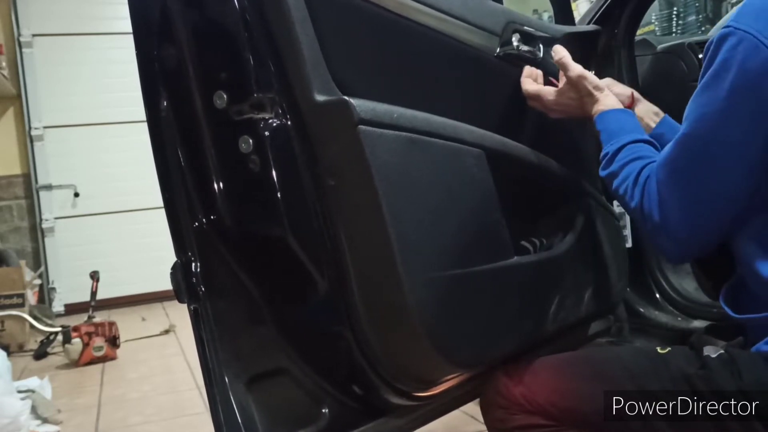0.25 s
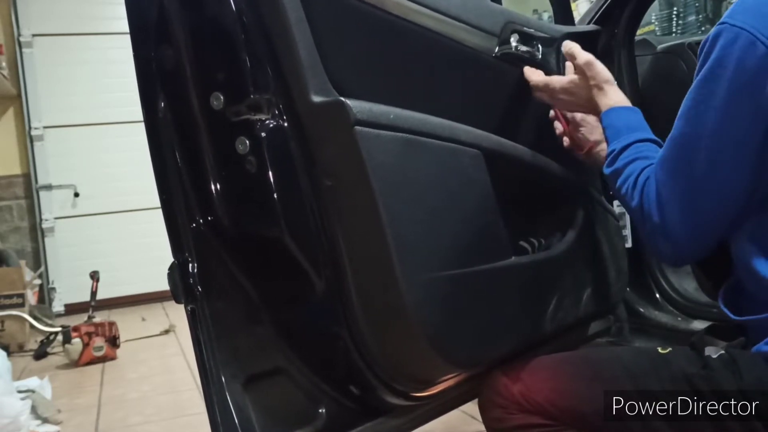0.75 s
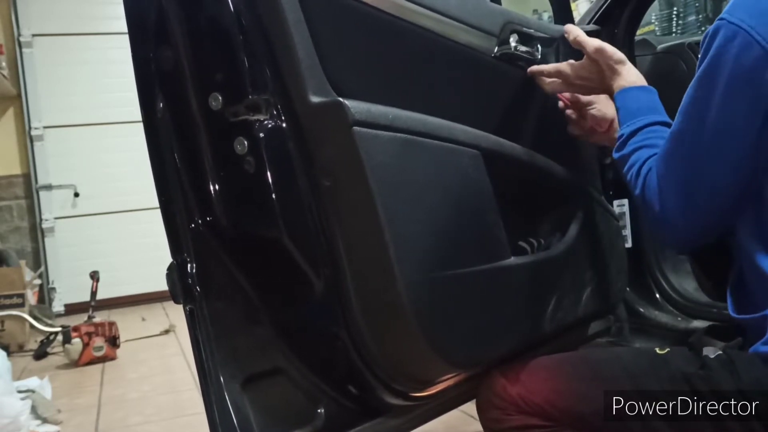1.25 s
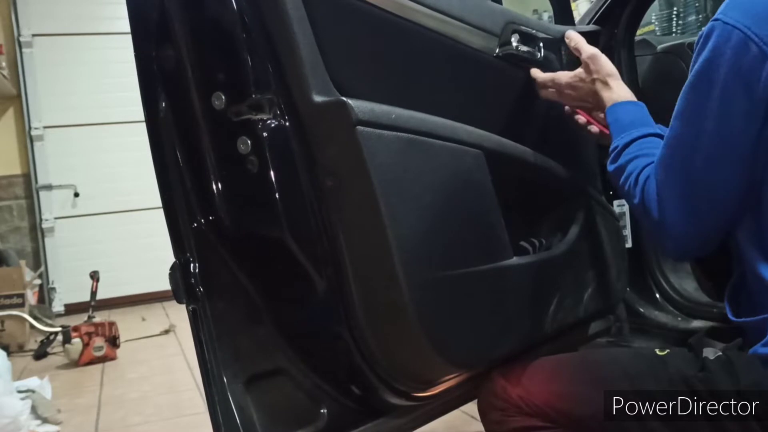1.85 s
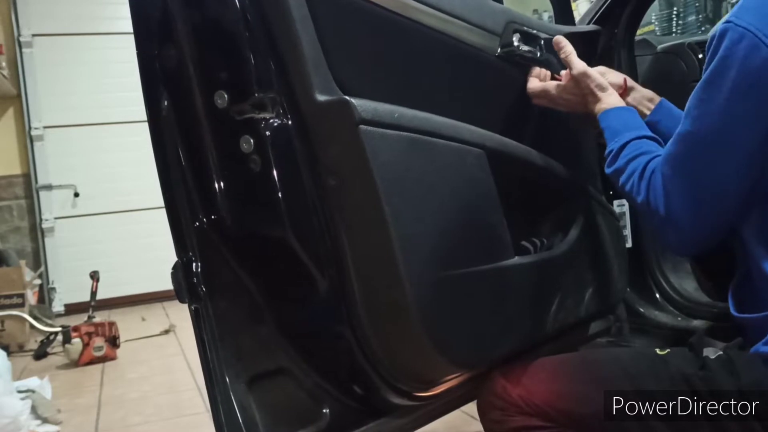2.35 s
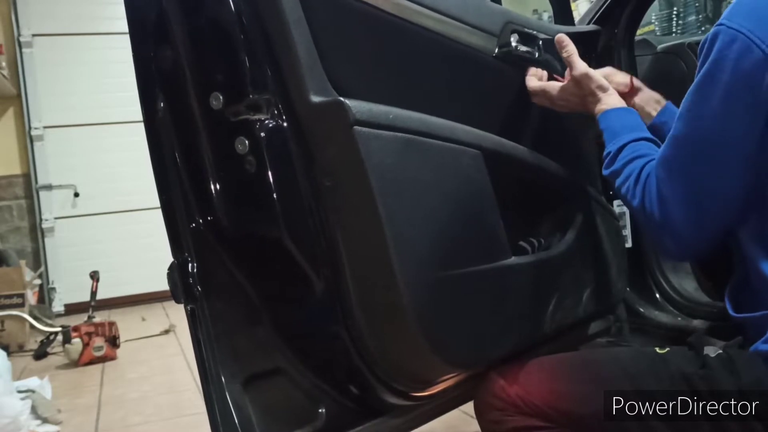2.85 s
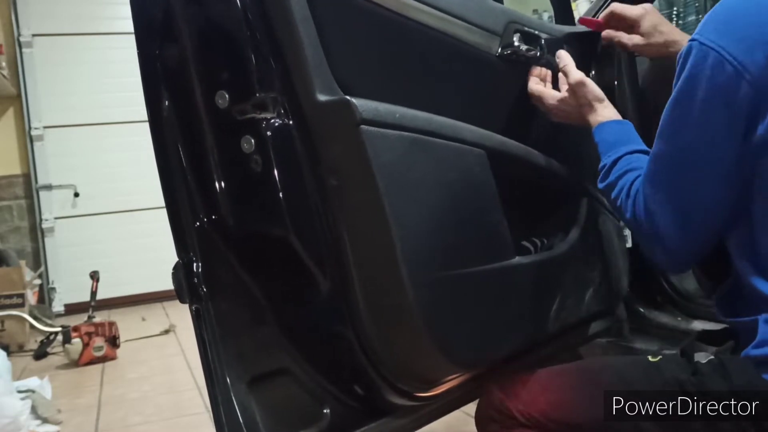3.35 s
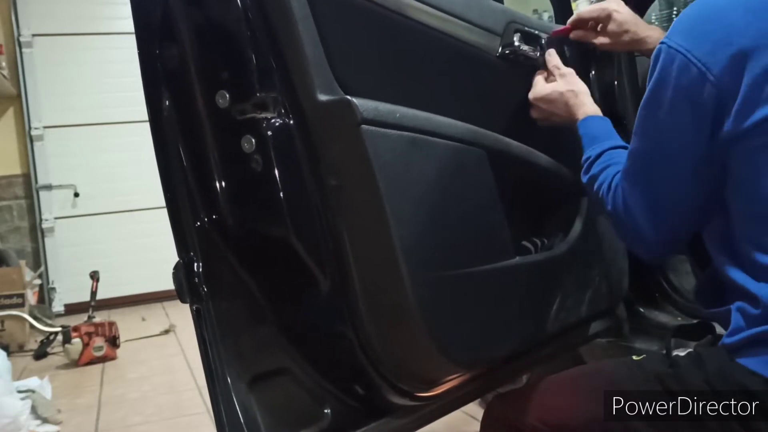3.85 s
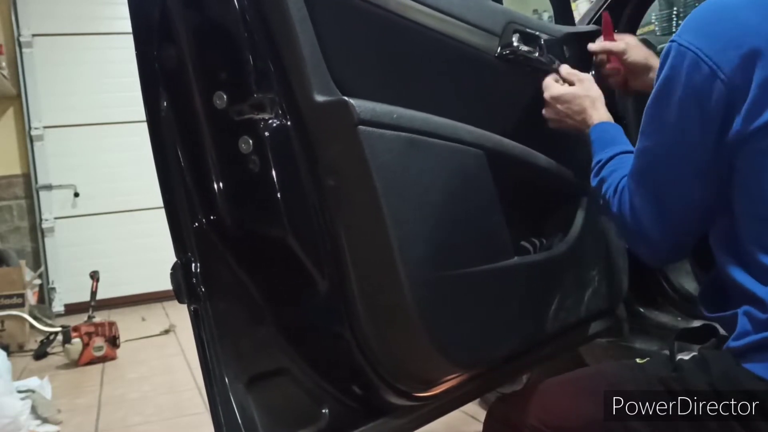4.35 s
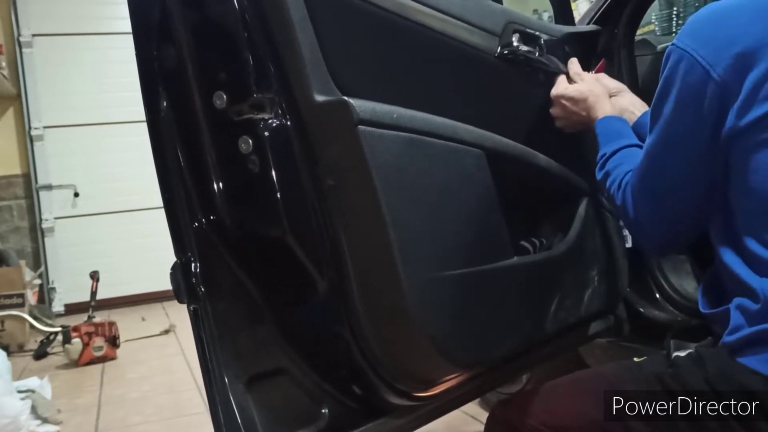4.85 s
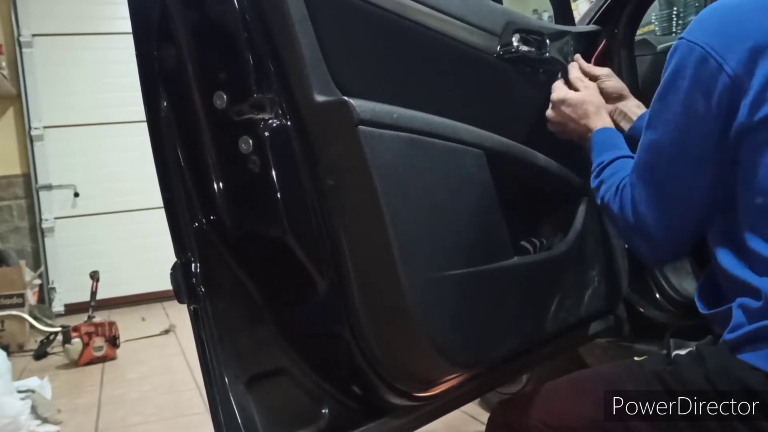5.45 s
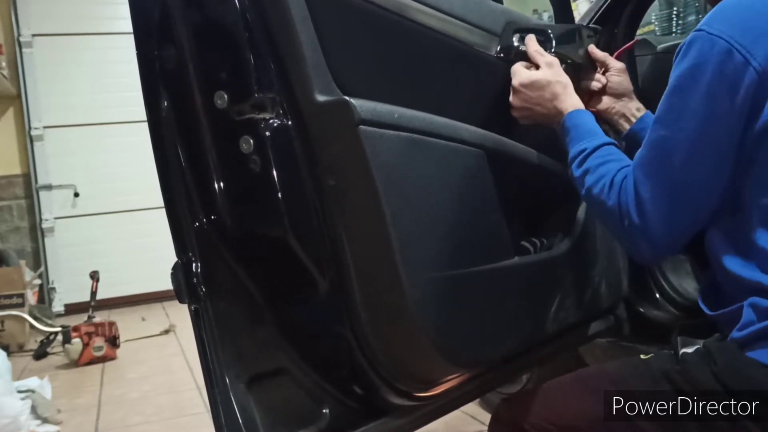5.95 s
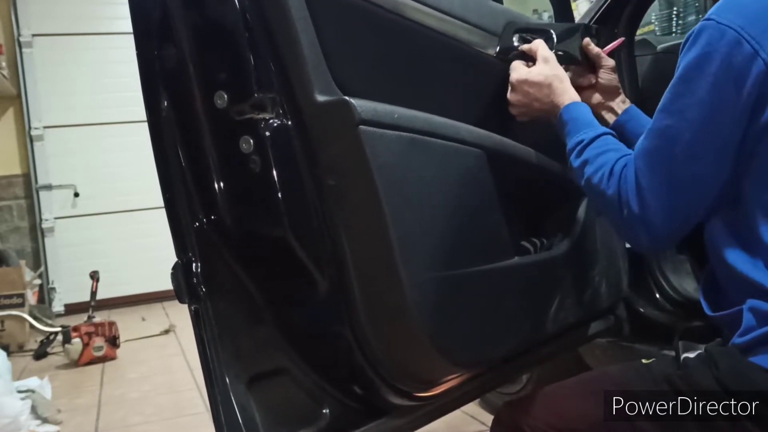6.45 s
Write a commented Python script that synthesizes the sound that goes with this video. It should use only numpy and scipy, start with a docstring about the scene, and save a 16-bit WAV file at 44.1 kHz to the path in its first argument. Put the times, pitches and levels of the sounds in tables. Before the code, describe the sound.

Plastic car door trim is pried off its clips with sharp snaps, hollow knocks, scrapes and two brief squeaks in a garage.

```python
"""A plastic trim piece is pried off an open car door in a garage. Sleeves rustle and the tool scrapes and ticks
until, at 1.6 s, a clip lets go with a sharp snap that knocks the hollow door panel. More clips follow, with
rough stick-slip squeaks at 2.8 s and 4.4 s and hollow taps of the tool's handle between. A cluster of snaps
comes near 5.2 s, then a few knocks and taps and a last scrape. The garage reverberates after every snap."""
import sys
import numpy as np
from scipy import signal
from scipy.fft import rfft, irfft, next_fast_len
from scipy.io import wavfile
from scipy.ndimage import map_coordinates

SR = 44100
rng = np.random.default_rng(int(sys.argv[2]) if len(sys.argv) > 2 else 0)


def to_wav(sig):
    """Store sig (one row per channel, or 1-D mono) as 16-bit WAV at the path in sys.argv[1].

    Samples outside -1..1 are clipped; the rate is SR.
    """
    pcm = np.clip(np.atleast_2d(sig), -1, 1) * 32767
    pcm = np.round(pcm).astype(np.int16)
    wavfile.write(sys.argv[1], SR, pcm.T)  # frames by channels


N = 295029

# modes of the trim piece: f/Hz, level/dB
TRIM_MODES = [(410, 0.5), (485, 1), (560, 1), (613, -6.5), (682, 4), (765, 6), (860, 5.5), (960, 4),
              (1050, 10.5), (1285, 9), (1510, -5), (1930, 9)]
# spectrum of a clip's crack, also of the scrape in a squeak: f/Hz, spectral level/dB
CRACK_SPECTRUM = [(900, -15.5), (2200, 3.5), (3100, 5), (4100, 7), (5500, 3), (7300, 7.5), (9000, -4),
                  (11500, -43.5)]


def amp(db):
    """Amplitude ratio of a level in decibels."""
    return 10 ** (np.asarray(db) / 20)


def unit(x):
    """Normalisation to rms 1."""
    return x / np.sqrt(np.mean(x ** 2) + 1e-20)


def along(points, hz):
    """Interpolation of (f/Hz, value) points on a logarithmic frequency axis."""
    f, v = np.transpose(points)
    return np.interp(np.log(hz + 1), np.log(f + 1), v)


def filtered(x, response):
    """Linear filtering: the spectrum of x times a frequency response."""
    n = x.shape[-1]
    m = next_fast_len(n + 2048)
    return irfft(rfft(x, m) * response(np.fft.rfftfreq(m, 1 / SR)), m)[..., :n]


def coloured(x, spectrum):
    """Spectral shaping by (f/Hz, level/dB) points, at rms 1."""
    return unit(filtered(x, lambda hz: amp(along(spectrum, hz))))


def add(track, s, sound):
    """Superposition of a sound on a track, from s seconds on."""
    part = track[..., max(round(s * SR), 0):][..., :sound.shape[-1]]
    part += sound[..., :part.shape[-1]]


def ring(hz, db, t60, t, scatter_db, detune):
    """Modal superposition: damped sinusoids that each contact excites a little differently."""
    size, shift, sign = rng.standard_normal((3, len(hz)))
    t = t[:, None]
    decay = amp(db + scatter_db * size - 60 * t / t60)
    return np.sum(np.sign(sign) * decay * np.sin(2 * np.pi * hz * (1 + detune * shift) * t), 1)


def focus(hz, pitch_hz, octaves):
    """Selective excitation: nearness, 0-1, of a frequency to the pitch a contact point favours."""
    return np.exp(-np.log2((hz + 1) / pitch_hz) ** 2 / (2 * octaves ** 2))


def blow(x, t, rise_s):
    """Finite rise of a struck sound, at rms 1 over its first 20 ms."""
    x = x * (1 - np.exp(-t / rise_s))
    return x / np.sqrt(np.mean(x[..., t < .02] ** 2))


def pulse(spectrum, t):
    """Impulse response of a spectrum, as strong as a blow."""
    x = coloured(signal.unit_impulse(len(t), SR // 1000), spectrum)
    return x / np.sqrt(np.mean(x[t < .02] ** 2))


def diffuse(pair):
    """Diffuse-field coherence: two unrelated signals become alike mainly in the bass."""
    coherence = [(60, 0.26), (130, 0.52), (250, 0.77), (640, 0.33), (1400, 0), (15000, 0.11)]  # f/Hz, left-right correlation
    turn = lambda hz: np.arccos(np.clip(along(coherence, hz), -1, 1)) / 2
    mid, side = filtered(pair, lambda hz: np.array([np.cos(turn(hz)), np.sin(turn(hz))]))
    return np.array([mid + side, mid - side])


def background(air_db=-64, hiss_db=-79):
    """Stationary noise: diffuse room air and a faint hiss."""
    air_spectrum = [(15, -26), (25, -18.5), (43, -9.5), (103, 2), (324, -6), (423, -4), (798, -41),
                    (1430, -14), (2770, -18), (4510, -13.5), (5350, -20.5), (7340, -16.5), (8500, -25.5),
                    (11000, -52.5), (18700, -120)]  # f/Hz, spectral level/dB
    hiss_spectrum = [(5000, -38), (8000, 2), (13000, -5), (16000, -8)]  # f/Hz, spectral level/dB
    air = coloured(diffuse(rng.standard_normal((2, N))), air_spectrum)
    hiss = coloured(rng.standard_normal((2, N)), hiss_spectrum)
    return amp(air_db) * air + amp(hiss_db) * hiss


def reverberation(x, build_s=0.00079):
    """Convolution with a fresh random room tail, decaying exponentially and fastest in the treble."""
    decay_times = [(80, 0.61), (250, 0.57), (800, 0.59), (2500, 0.64), (7000, 0.44), (14000, 0.27)]  # f/Hz, T60/s
    hz, t, noise = signal.stft(rng.standard_normal((2, SR * 5 // 8)), SR, nperseg=256)
    tail = signal.istft(noise * amp(-60 * t / along(decay_times, hz)[:, None]), SR, nperseg=256)[1]
    tail *= 1 - np.exp(-np.arange(tail.shape[1]) / SR / build_s)
    return signal.fftconvolve(x[None], tail / np.linalg.norm(tail[0]), axes=1)


def garage(blows, handling, stretches=14):
    """Reverberant field: each blow has its own tail, as has each stretch of handling as the body moves."""
    room_response = [(80, -3), (250, -0.5), (800, 0.5), (2500, 0), (7000, -1), (14000, 1.5)]  # f/Hz, level/dB
    out, start = np.zeros((2, N)), 0
    for s, sound in blows:
        add(out, s, reverberation(sound))
    for piece in np.array_split(handling, stretches):
        add(out, start / SR, reverberation(piece))
        start += len(piece)
    return diffuse(filtered(out, lambda hz: amp(along(room_response, hz))))


def swells(strokes):
    """Amplitude envelope: a half sine for each stroke."""
    gain = np.zeros(N)
    for s, length, db in strokes:
        add(gain, s, amp(db) * np.sin(np.linspace(0, np.pi, round(length * SR))))
    return gain


def rubbing(pressure, spectrum, slips_per_s, spread_db):
    """Friction as shot noise: a dense run of tiny slips of uneven size."""
    slips = (rng.random(N) < slips_per_s / SR) * rng.standard_normal(N)
    slips *= amp(spread_db * rng.standard_normal(N))
    return pressure * coloured(slips, spectrum)


def sleeves():
    """Cloth friction: sleeves brush past in slips so dense that they merge into a rustle."""
    brushes = [(0.0, 0.17, -64), (1.02, 0.22, -63.5), (2.75, 0.14, -59), (3.38, 0.81, -63.5),
               (4.4, 0.18, -56), (4.8, 0.26, -59.5), (5.47, 0.071, -52.5), (5.98, 0.087, -61.5)]  # t/s, duration/s, level/dB
    cloth_spectrum = [(1000, -16), (4000, 4), (6000, 3), (7400, 10.5), (8500, -3), (15000, -22)]  # f/Hz, spectral level/dB
    return rubbing(swells(brushes), cloth_spectrum, slips_per_s=8200, spread_db=7)


def scraping(fidget_db=-69, swing_db=3.5, fidgets_per_s=9):
    """Sliding friction of tool and fingers on the trim; between strokes the fingers never quite rest."""
    strokes = [(0.0, 0.11, -58.5), (0.2, 0.036, -54), (0.71, 0.16, -65.5), (1.07, 0.066, -45.5),
               (1.14, 0.12, -68), (1.615, 0.2, -38.5), (2.02, 0.17, -50), (2.66, 0.12, -54),
               (2.78, 0.11, -48.5), (2.92, 0.14, -62), (3.8, 0.059, -64), (4.84, 0.34, -63),
               (6.66, 0.44, -38)]  # t/s, duration/s, level/dB
    scrape_spectrum = [(60, -26.5), (150, -2.5), (400, 6.5), (850, 10), (1400, 0), (2200, -8.5),
                       (4000, -12.5), (7300, -12), (15000, -41)]  # f/Hz, spectral level/dB
    wobble = map_coordinates(rng.standard_normal(512), [np.arange(N) * fidgets_per_s / SR], mode="wrap")
    fidget = amp(fidget_db + swing_db * wobble)
    return rubbing(swells(strokes) + fidget, scrape_spectrum, slips_per_s=760, spread_db=-1.5)


def squeaks(light_db=9.5, firm_db=-9, jitter_hz=320, rasp_db=4):
    """Stick-slip oscillation of plastic: faster, louder and more uneven as the push grows."""
    # t/s, duration/s, first and final slip rate/Hz, share of the duration spent climbing, level/dB,
    # relative jitter of the rate, level of the upper partials and scrape/dB
    pushes = [(2.761, 0.097, 771, 1070, 0.52, -40, 0.08, -8), (4.442, .262, 1488, 2710, .83, -34, .07, 0)]
    edge_resonances = [(900, -8), (1500, -5.5), (2100, -4.5), (2750, 0.5), (3100, -20), (3500, 2),
                       (4600, 3), (4950, -5.5), (5700, -11), (6500, 1.5), (7300, -9.5), (9000, -17)]  # f/Hz, level/dB
    out = np.zeros(N)
    for s, length, start_hz, end_hz, glide_share, db, uneven, upper_db in pushes:
        u = np.linspace(0, 1, round(length * SR))
        push, release = np.minimum(u / .68, 1), np.minimum((1 - u) / .32, 1)
        hz = start_hz + (end_hz - start_hz) * np.minimum(u / glide_share, 1)
        noise = rng.standard_normal((2, N))[:, :len(u)]
        pace, grip = unit(filtered(noise, lambda f: 1 / (1 + (f / jitter_hz) ** 4)))
        phase = 2 * np.pi * np.cumsum(hz * (1 + uneven * push * pace)) / SR
        partials = [(2, 0), (3, upper_db - 6), (4, upper_db - 13)]
        overtones = sum(amp(level) * np.sin(k * phase) for k, level in partials)
        overtones *= amp(light_db + (firm_db - light_db) * push)  # a firm push gives a purer tone
        scrape = amp(upper_db - 14) * coloured(rng.standard_normal(len(u)), CRACK_SPECTRUM)
        envelope = push ** 1.98 * release * amp(db + rasp_db * grip)
        slips = envelope * (np.sin(phase) + overtones + scrape)
        add(out, s, filtered(slips, lambda f: amp(along(edge_resonances, f))))
    return out


def taps(focus_db=12, tick_t60=0.032, bounce_s=0.011, bounce_db=-7):
    """Impact and rebound: the tool ticks, its hollow handle rings, and it bounces once."""
    strikes = [(3.765, -44.5, 650, -15), (3.792, -44.5, 650, -15), (3.804, -39.5, 660, -16),
               (3.812, -41.5, 520, -12), (3.988, -50.5, 710, -18), (4.582, -46, 430, -34.5),
               (5.573, -46, 860, -2), (5.694, -43, 855, -6.5), (6.2915, -32, 630, -24)]  # t/s, level/dB, pitch/Hz, tick re tock/dB
    handle_modes = [(423, -6.5, 0.078), (508, -3, 0.056), (608, -8, 0.077), (789, -4, 0.064),
                    (978, 5, 0.032), (1122, -2.5, 0.039)]  # f/Hz, level/dB, T60/s
    tip_spectrum = [(900, -15), (1800, -1), (2500, 1), (3000, -5), (4000, 8), (4800, -14), (8000, -28.5)]  # f/Hz, spectral level/dB
    out, t = np.zeros(N), np.arange(SR // 8) / SR
    hz, db, t60 = np.transpose(handle_modes)
    for s, level, pitch_hz, tick_db in strikes:
        excited_db = db + focus_db * focus(hz, pitch_hz, octaves=.2)
        for k in range(2):
            tock = ring(hz, excited_db, t60, t, scatter_db=1.5, detune=0.012)
            tick = coloured(rng.standard_normal(len(t)), tip_spectrum) * amp(-60 * t / tick_t60)
            tap = blow(tock, t, rise_s=0.0013) + amp(tick_db) * blow(tick, t, rise_s=0.003)
            add(out, s + k * bounce_s, amp(level + k * bounce_db) * tap)
    return out


def after_ring(pitch_hz, t, trim_db=-16, clip_db=-22, trim_t60=0.33, focus_db=6):
    """Free vibration: once the contact opens, trim and clip ring on weakly at their own pitches."""
    clip_modes = [(1830, -1.5, 0.23), (1944, -11, 0.4), (2230, -2, 0.27), (3550, -1, .2), (4540, -7.5, .2),
                  (6680, -15, .22), (7450, 1.5, .28), (14000, -15, .2)]  # f/Hz, level/dB, T60/s
    hz, db = np.transpose(TRIM_MODES)
    excited_db = db + focus_db * focus(hz, pitch_hz, octaves=.4)
    trim = ring(hz, excited_db, trim_t60, t, scatter_db=3, detune=.004)
    clip = ring(*np.transpose(clip_modes), t, scatter_db=3, detune=.002)
    return amp(trim_db) * blow(trim, t, rise_s=.004), amp(clip_db) * blow(clip, t, rise_s=.002)


def door_thud(t):
    """Panel resonance: a blow excites the low modes of the hollow door."""
    door_modes = [(47, -8, 0.11), (99, -17.5, 0.52), (145, -5, 0.26), (191.6, 2, 0.18), (247.6, 7.5, 0.1),
                  (282.6, 0.5, 0.12), (337, 4, 0.13), (413.4, 6, 0.15), (490.5, 3.5, 0.073)]  # f/Hz, level/dB, T60/s
    return blow(ring(*np.transpose(door_modes), t, scatter_db=1.5, detune=.02), t, rise_s=0.00035)


def trim_knock(pitch_hz, t, rise_s, focus_db=13.5, cycles=17, clatter_db=-3, clatter_t60=0.045):
    """Heavy damping: the trim dies within a few cycles; modes near the contact's pitch are favoured."""
    overtone_spectrum = [(150, -41), (400, 8), (700, -1.5), (1050, -2.5), (1550, 5), (2100, 4), (3200, -9),
                         (6000, -47)]  # f/Hz, spectral level/dB
    boost = lambda hz: focus_db * focus(hz, pitch_hz, octaves=.4)
    hz, db = np.transpose(TRIM_MODES)
    modes = blow(ring(hz, db + boost(hz), cycles / hz, t, scatter_db=2.5, detune=0.025), t, rise_s)
    dense = filtered(coloured(rng.standard_normal(len(t)), overtone_spectrum), lambda f: amp(boost(f)))
    clatter = blow(dense * amp(-60 * t / clatter_t60), t, rise_s=0.0019)
    return (modes + amp(clatter_db) * clatter) / np.hypot(1, amp(clatter_db))


def crack(spectrum, t, t60):
    """Scattering: the first wavefront is alike left and right, its scatter off the door is not."""
    front = coloured(rng.standard_normal(len(t)), spectrum) * amp(-60 * t / t60)
    scatter = coloured(rng.standard_normal((2, len(t))), spectrum) * amp(-4 - 60 * t / (2.1 * t60))
    return blow(front + scatter, t, rise_s=0.00076)


def contacts(chatter_count=6, scatter_octaves=0.56):
    # t/s, level/dB, relative thud, crack and sheen/dB, pitch/Hz, crack tilt/(dB/octave), room send/dB
    clip_releases = [(1.5792, -22, -14, -0.5, -13, 1095, 0, -2),
                     (2.2662, -21, -21.5, -1, -23.5, 1140, 2, -2.5),
                     (3.2372, -35.5, -11.5, -1, -7, 1730, -7, -3.5),
                     (4.044, -32.5, -15, 9, 8, 1320, 2.5, 0), (5.1438, -20.5, -17, -1, -8, 940, 8, -2),
                     (5.1802, -28.5, -23.5, 6, -4, 2150, 4.5, -2),
                     (5.184, -28, -10.5, 2.5, -2.5, 2110, 2, -3.5)]
    # the tool knocks or the freed trim lands: t/s, level/dB, relative thud and crack/dB, pitch/Hz
    knocks = [(0.209, -61, -1, -4, 435), (0.36, -75, 17.5, -30, 304), (0.577, -51, -4.5, -1, 770),
              (0.72, -59, 6.5, -37, 610), (0.807, -53.5, -6.5, -27, 750), (1.032, -72.5, -7, 13, 598),
              (1.153, -71.5, 12.5, 11.5, 350), (1.423, -48.5, -19, -0.5, 970),
              (1.444, -38.5, -16, -6.5, 830), (1.48, -47, -16, -18, 463), (1.5811, -23.5, -7.5, -20, 740),
              (2.0, -44, -18.5, -7, 790), (2.022, -46, -17, -3, 1250), (2.27, -37, -9, -16.5, 636),
              (2.692, -53.5, -13, -8, 634), (2.908, -44.5, -12, -1.5, 875), (2.914, -53, -22, -22, 410),
              (2.972, -51, -3, -11, 486), (3.025, -48.5, -3, -17, 706), (3.2418, -36.5, -11.5, -31, 880),
              (3.811, -44.5, -17.5, 0, 1160), (3.879, -59, 0.5, -21.5, 1600),
              (4.047, -33.5, -12.5, 0.5, 790), (4.312, -56, -0.5, 5.5, 587), (4.438, -55.5, -9.5, -7, 710),
              (4.581, -50, 2.5, -4, 346), (4.837, -57.5, -18.5, 3.5, 1110), (4.875, -56.5, -8, -5.5, 860),
              (4.938, -57.5, -17.5, 1, 1190), (4.963, -59.5, -13.5, -7.5, 1310),
              (4.986, -57, -19.5, -5, 1120), (5.148, -24, -4, -8, 526), (5.2, -23.5, -9.5, -11, 633),
              (5.2056, -25.5, -7, -28, 520), (5.572, -53, -17, 3, 2280), (6.187, -48, -0.5, -8.5, 483),
              (6.277, -52, 4.5, 7, 2400), (6.29, -37, -5, -8.5, 960)]
    # loose trim rattles on its clip: t/s, duration/s, level/dB, relative thud and crack/dB, pitch/Hz
    chatters = [(1.615, .064, -36, -6.5, 3, 455), (4.067, .045, -42.5, -9.5, 7, 870)]
    yield from clip_releases
    for s, db, thud_db, crack_db, hz in knocks:
        yield s, db, thud_db, crack_db, crack_db - 11, hz, 0, 0
    for s, length, db, thud_db, crack_db, hz in chatters:
        for k in range(chatter_count):
            onset = s + length * (k + rng.random()) / chatter_count
            pitch_hz = hz * 2 ** (scatter_octaves * rng.standard_normal())
            yield onset, db, thud_db, crack_db, crack_db - 38, pitch_hz, 0, 0  # blunt: little sheen


def snaps(pivot_hz=4500, firm_db=-16, firm_rise_s=0.0015, softening=0.57, room_focus_db=9):
    """Impact radiation: each contact thuds, knocks, cracks and rings; gives direct and room-bound sound."""
    # high sizzle of a snap, boosted at 10 kHz where the microphone's notch cuts it: f/Hz, level/dB
    sheen_spectrum = [(7000, -42), (10000, 24.5), (12000, 5), (13600, 3.5), (16000, -5.5)]
    knock_power = [(150, -37), (400, 4), (650, 6.5), (1000, 1), (1500, -1), (2050, -2), (3200, -24.5),
                   (6000, -45.5)]  # summed over all directions: f/Hz, spectral level/dB
    direct, to_room, t = np.zeros((2, N)), [], np.arange(SR // 4) / SR
    room_sheen = amp(-1) * pulse(sheen_spectrum, t)
    for s, db, thud_db, crack_db, sheen_db, pitch_hz, tilt, send_db in contacts():
        knock_gain, crack_gain, sheen_gain = amp([1, crack_db, sheen_db - 1])
        # a stiff clip tilts its crack towards the treble, a soft one towards the bass
        tilted = [(hz, level + tilt * np.log2(hz / pivot_hz)) for hz, level in CRACK_SPECTRUM]
        rise_s = firm_rise_s * amp(softening * (firm_db - db))  # lighter blows rise more slowly
        thud = amp(thud_db - 1) * door_thud(t)
        knock = trim_knock(pitch_hz, t, rise_s)
        trim_ring, clip_ring = after_ring(pitch_hz, t)
        trim = knock_gain * (knock + trim_ring)
        clip = crack_gain * (crack(tilted, t, t60=0.023) + clip_ring)
        sheen = sheen_gain * crack(sheen_spectrum, t, t60=0.0085)
        add(direct, s, amp(db) * (thud + trim + clip + sheen))
        # directivity: the trim beams a few modes at the listener; the room takes a smooth sum of all
        radiated = [(hz, level + room_focus_db * focus(hz, pitch_hz, octaves=0.55))
                    for hz, level in knock_power]
        room_knock = amp(-4) * pulse(radiated, t)
        room_crack = amp(-1.5) * pulse(tilted, t)
        spread = amp(-1) * thud + knock_gain * room_knock
        spread += crack_gain * room_crack + sheen_gain * room_sheen
        to_room.append((s, amp(db + send_db - 1) * spread))
    return direct, to_room


def scene(scrape_db=-3, sleeve_db=-2, squeak_db=-3, tap_db=-2, tap_room_db=-8, lag_s=3.5 / SR):
    """Direct plus reverberant field; the work is to the right, so its direct sound lags on the left."""
    friction = amp(scrape_db) * scraping() + amp(sleeve_db) * sleeves() + amp(squeak_db) * squeaks()
    hits, to_room = snaps()
    tocks = amp(tap_db) * taps()
    path_delay = lambda hz: np.exp(1j * np.pi * hz * lag_s * np.array([[-1], [1]]))
    direct = filtered(hits + tocks + friction, path_delay)
    return direct + garage(to_room, amp(tap_room_db) * tocks + friction) + background()


def record(dry, ceiling=.95, top_hz=16600):
    """Transduction: the microphone colours the sound, rounds the tallest peaks and limits the band."""
    mic_response = [(30, -20), (80, 6.5), (4500, -0.5), (5100, -3), (5800, -2), (6500, 3), (8450, 2.5),
                    (8950, -21.5), (11300, -30), (11650, 6.5), (15100, 16), (16100, -24)]  # deeply notched in the treble: f/Hz, level/dB
    heard = filtered(dry, lambda hz: amp(along(mic_response, hz)))
    rounded = heard / (1 + (heard / ceiling) ** 6) ** (1 / 6)
    return filtered(rounded, lambda hz: hz < top_hz)


dry = scene()
out = record(dry)
to_wav(out)
```